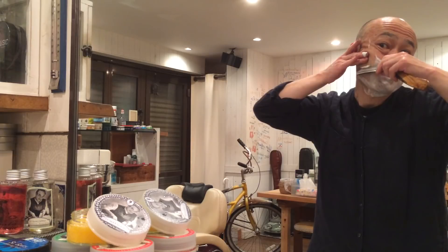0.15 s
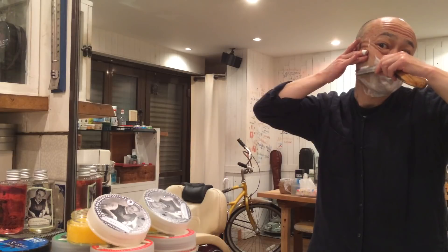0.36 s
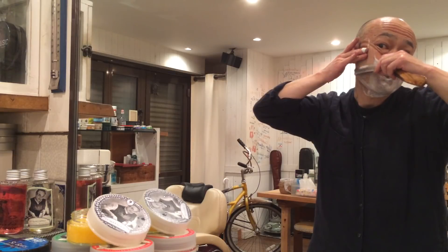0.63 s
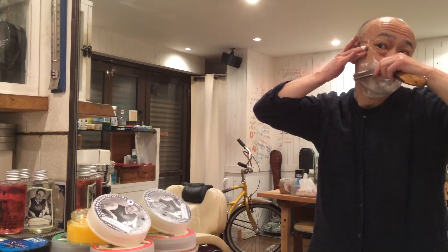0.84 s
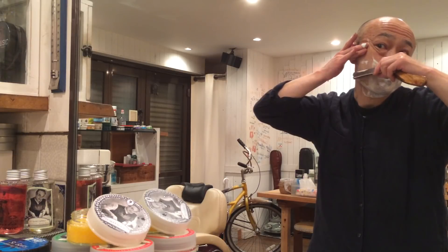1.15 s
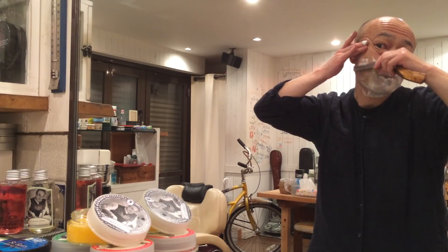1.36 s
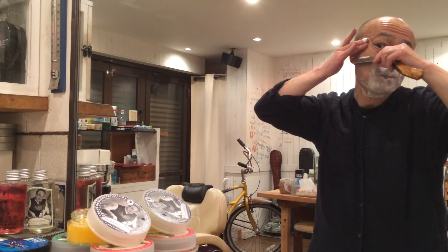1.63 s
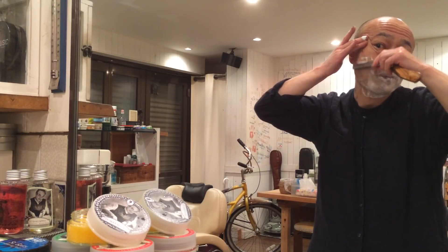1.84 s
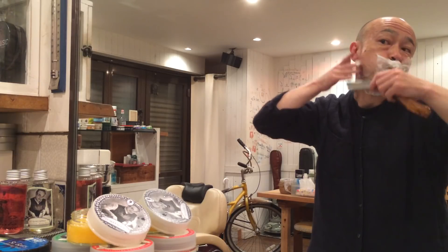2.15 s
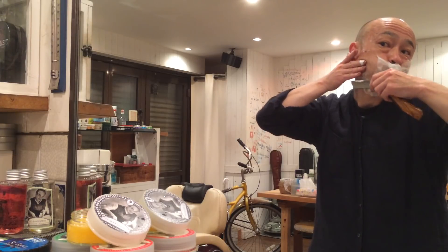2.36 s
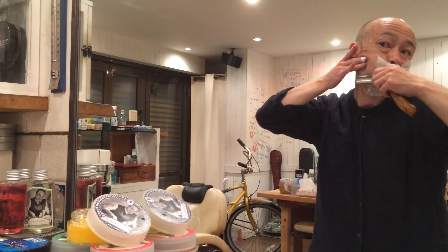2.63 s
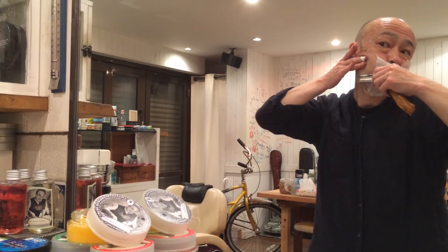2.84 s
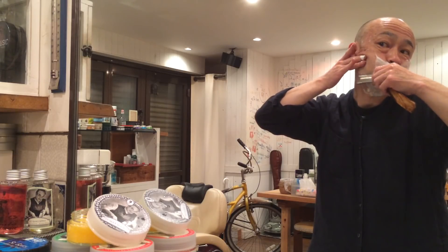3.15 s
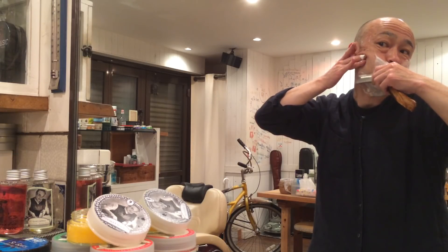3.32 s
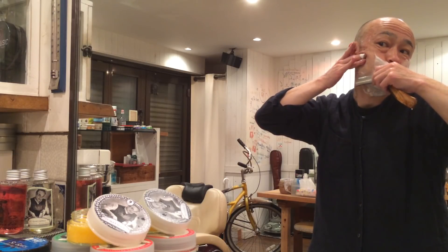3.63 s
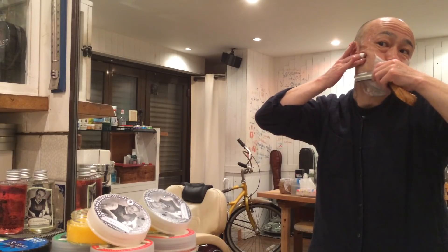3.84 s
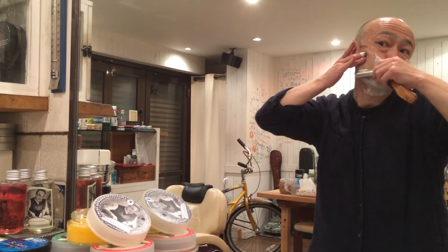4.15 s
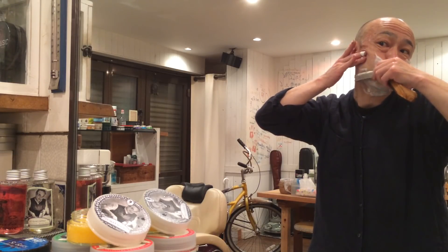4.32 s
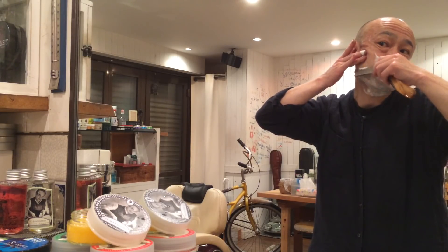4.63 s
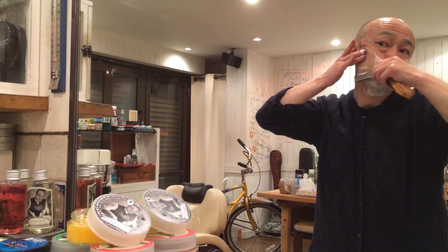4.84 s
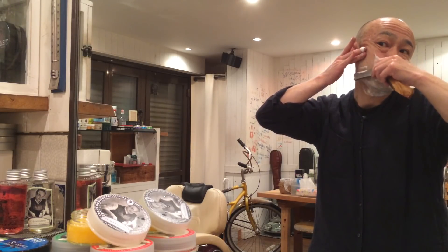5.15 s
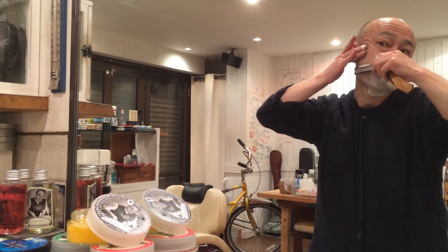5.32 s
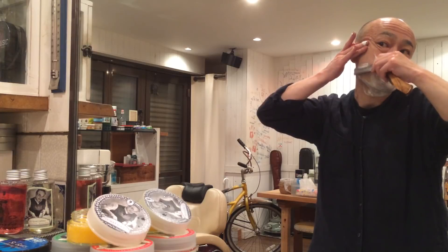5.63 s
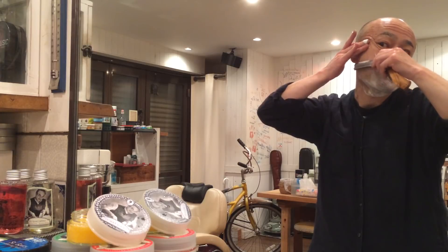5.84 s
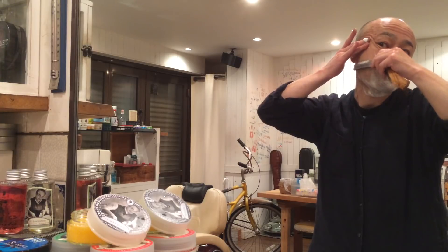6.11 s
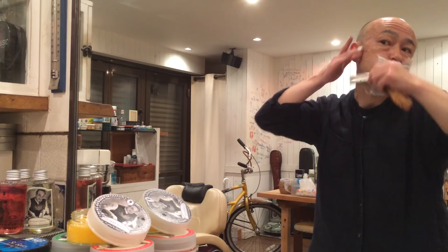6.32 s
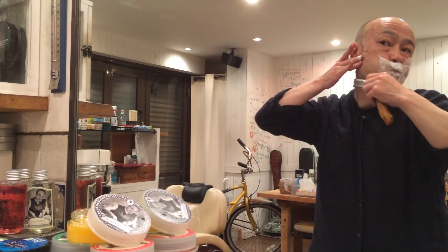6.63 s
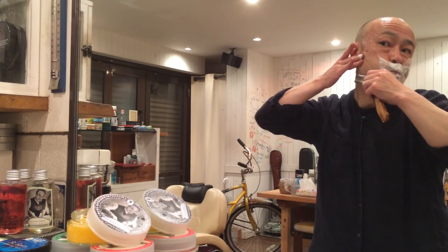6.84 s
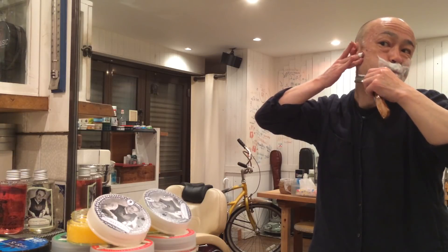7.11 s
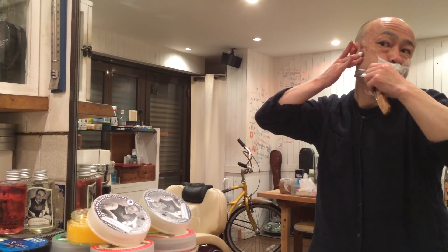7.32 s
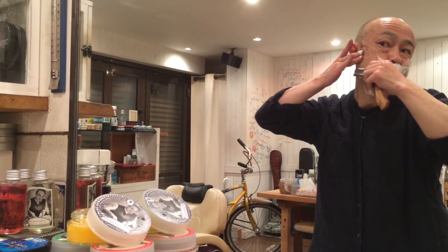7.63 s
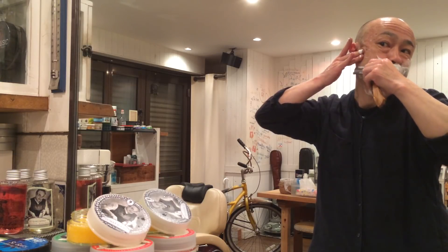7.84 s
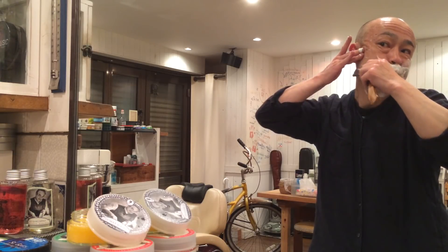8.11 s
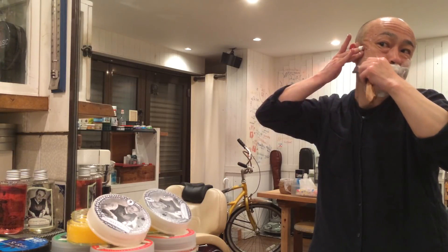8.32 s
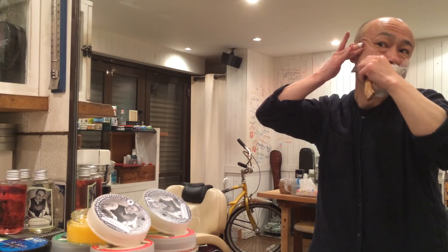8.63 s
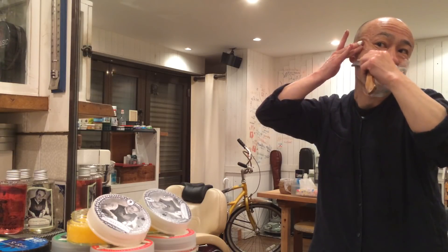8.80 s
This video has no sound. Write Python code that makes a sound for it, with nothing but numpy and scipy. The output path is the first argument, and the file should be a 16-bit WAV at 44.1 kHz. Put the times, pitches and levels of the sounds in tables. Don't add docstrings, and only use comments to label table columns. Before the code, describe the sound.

Dry, gritty shaving strokes with a faint thin metallic ring come in irregular groups, then steadily about three per second, then lightly at the end. Behind them a vehicle goes by outside, rumbling and hissing loudest around two seconds, slowing and sinking away to a faint low hum. Short room reflections, a fairly close microphone and slight steady background hiss.

```python
import sys
import numpy as np
from scipy import signal
from scipy.io import wavfile
from scipy.ndimage import uniform_filter1d

SR = 44100
rng = np.random.default_rng(int(sys.argv[2]) if len(sys.argv) > 2 else 0)


def boost_factor(decibels):
    exponent = np.asarray(decibels, float) / 20
    return 10 ** exponent


def materialize(psi):
    bounded = np.clip(np.atleast_2d(psi).T, -1, 1)
    quanta = np.round(bounded * 32767).astype(np.int16)
    wavfile.write(sys.argv[1], SR, quanta)


N = 395577
CONTROL_STEP = 100
CONTROL_T = np.arange(N // CONTROL_STEP + 2) * CONTROL_STEP / SR

# (frequency [Hz], density [dB per Hz])
HAIR_SNAP = [(2500, -10), (4700, -40), (5600, -3), (7700, -3), (8400, -6.5), (9800, -2.5), (11000, -3.5),
             (12500, -2), (14000, -2.5), (15200, -2.5), (15500, 5), (16000, -59)]
# (frequency [Hz], width [Hz], level [dB])
SPINE_MODES = [(5290, 200, 0), (5620, 220, 0), (6250, 300, -6), (4880, 250, -9)]
# (frequency [Hz], width [Hz], level [dB])
EDGE_MODES = [(6960, 170, -3), (7330, 160, 0), (9850, 180, -9), (10240, 180, -8)]
# (bite [s], length [s], pressure [dB], crest place [0-1], edge ring [dB])
CHEEK_STROKES = [
    (0.103, 0.12, -59, 0.62, -3),
    (0.286, 0.03, -83, .4, -2),
    (0.391, 0.14, -62, 0.38, -3),
]
# (bite [s], length [s], pressure [dB], crest place [0-1], edge ring [dB])
TIP_STROKES = [
    (0.68, 0.053, -65.5, .4, -4),
    (0.728, 0.082, -65.5, .25, -3),
    (0.985, 0.025, -77, .4, -5),
    (1.02, 0.082, -67, 0.33, -2),
    (1.3, 0.075, -73, .6, -1),
    (1.59, 0.067, -69, 0.77, 0),
    (1.885, 0.11, -67.5, .65, 2.5),
]
# (bite [s], length [s], pressure [dB], crest place [0-1], edge ring [dB])
JAW_STROKES = [(3.005, 0.075, -72.5, 0.56, -8), (3.255, 0.057, -68.5, 0.69, -3),
               (3.513, 0.064, -71.5, .6, 0), (3.818, 0.085, -71, 0.38, -5), (4.01, 0.025, -86, .5, 0),
               (4.09, 0.12, -66, 0.44, -6), (4.394, 0.085, -65.5, .5, -3), (4.666, 0.099, -66.5, 0.5, -3),
               (4.84, 0.025, -82, 0.33, 4), (4.964, 0.11, -67.5, 0.33, -3.5),
               (5.258, 0.115, -69.5, 0.45, -0.5), (5.566, 0.12, -64.5, .5, -1.5),
               (5.735, 0.03, -84, .3, -3), (5.833, 0.13, -65.5, 0.67, -0.5), (6.164, 0.12, -63.5, .3, -1)]
# (bite [s], length [s], pressure [dB], crest place [0-1], edge ring [dB])
FINISHING_STROKES = [
    (7.282, 0.081, -78.5, 0.47, -2),
    (7.62, 0.047, -79, 0.72, -2),
    (7.89, 0.11, -72, 0.48, -1.5),
    (8.215, 0.11, -76, 0.32, 1),
    (8.52, 0.127, -70.5, 0.56, -4),
    (8.71, 0.048, -79, .4, 0),
    (8.843, 0.095, -72, 0.3, -3),
]
# (bite under crest [dB], lift under crest [dB], squareness [exponent],
# spine ring [dB], lowest edge mode [dB], edge pitch [ratio])
HOLDS = [
    (19.5, 18, 1.65, -6.5, 2, 1.0),
    (10, 14, 1.2, -7, -2, 1.012),
    (9, 16, 3, -7.5, -0.5, 1.002),
    (10.5, 10, 1.5, -7, 0, 1.002),
]
# (frequency [Hz], t60 [s])
ROOM_T60 = [(2000, 0.15), (7000, 0.24), (15000, 0.14)]

# (time [s], cycle rate [Hz])
CYCLE_RATE = [(0, 28.2), (.5, 27.8), (2.5, 24.8), (3, 24.3), (6, 22), (7, 20.7), (8, 19.65), (8.97, 18.5)]
# (multiple of the cycle rate [1], level over the engine's [dB])
ORDERS = [(2, -11), (4, -13), (5, -13.5), (6, -14), (8, -2.5), (9, -1.5), (10.8, -13.5), (12, -18.5)]
# (row of ORDERS, centre [s], half length [s],
# level [dB])
MODE_CROSSINGS = [(0, 1.5, 0.74, -2), (0, 3.5, .6, 8.5), (1, 1.45, 0.94, 19.5), (1, 7.7, 1.6, 13.5),
                  (2, 1.53, 0.59, 18), (2, 3.13, 1.1, 12), (2, 7.4, 0.34, 16.5), (3, 2.0, .3, 21),
                  (3, 2.97, 0.29, 16.5), (3, 4.64, 0.35, 10), (4, 2.04, 0.38, 4), (4, 3.6, 0.45, 5.5),
                  (4, 6.5, 0.47, 5), (4, 7.48, .45, 8.5), (5, 0.091, 0.48, 5), (5, 1.5, 0.14, 2.5),
                  (5, 2.45, 0.21, 11.5), (5, 6.22, 0.49, 8), (6, 2.62, 0.21, 7), (6, 4.6, 1.9, 9),
                  (7, 0.27, 0.33, 10), (7, 6.2, .6, 14.5), (7, 7.7, 0.64, 13.5), (4, 0.5, 0.21, -3.5),
                  (5, 7.8, .8, -6.5), (5, 4.47, 0.27, 5), (2, 1.07, 0.23, 8)]

# (time [s], level [dB])
NEARNESS = [(0.0, -57.5), (0.3, -56), (0.7, -55), (1.1, -52.5), (1.8, -50.5), (2.2, -49.5), (2.8, -52.5),
            (3.2, -54.5), (4.0, -55.5), (4.9, -57), (6.0, -61.5), (6.5, -63), (7.0, -64.5), (8.0, -68.5),
            (8.5, -69), (8.97, -72)]
# (level at nearness -60 [dB], share of the nearness [1], extra in the gap [dB])
LAYERS = [
    (-62, 0.2, 8),
    (-55.5, 0.98, 3.5),
    (-79.5, 0.42, 4.5),
    (1, 0.05, -3),
    (-57, .8, 0.5),
]
APPROACH_DB = [
    8,
    5,
    4,
    5,
    4,
]
# (time [s], half length [s], thrum [dB], boom [dB])
RUMBLE_SWELLS = [(0.1, .1, -1, -0.5), (0.294, 0.055, 2.5, 3.5), (0.95, 0.076, 6, 2.5), (1.252, 0.077, 0, 1),
                 (1.51, 0.056, 10, 0), (1.7, 0.088, 2, 3), (1.857, 0.063, 8, -2.5), (2.03, 0.062, 5, 4),
                 (2.21, 0.056, 6, -4.5), (2.47, 0.091, -5.5, -3), (2.75, .1, 4, 2.5), (3.71, 0.071, 6, 1.5),
                 (4.797, 0.23, -2, 1), (5.603, 0.14, 1, 1), (6.07, .05, 4, 0), (6.506, 0.42, -6, 1),
                 (6.9, 0.11, -7, -7), (7.997, 0.63, 4, 0.5)]
# (frequency [Hz], density [dB per Hz])
THRUM = [(12, -48), (20, -29.5), (44, -2), (76, 7.5), (95, 4), (120, -41.5), (210, -120)]
# (frequency [Hz], density [dB per Hz])
BOOM = [(50, -23), (85, -30.5), (113, 1.5), (147, 4.5), (177, -4), (216, -2), (235, -3), (310, -14),
        (400, -41), (680, -120)]
# (frequency [Hz], density [dB per Hz])
ROAR = [(170, -34), (290, -10), (308, -7.5), (344, 2), (404, 0.5), (470, -5), (509, -6.5), (738, -11.5),
        (816, -15), (1090, -14), (2060, -24.5), (2870, -32.5), (3200, -38), (4160, -56), (7040, -120)]
# (frequency [Hz], density [dB per Hz])
HISS = [(1650, -37), (2800, -23), (2960, -2), (3540, 3.5), (4270, 1), (4820, 2.5), (6370, 1), (10500, -7.5),
        (15400, -16.5)]
# (frequency [Hz], density [dB per Hz])
ROOM_HUM = [(160, -35), (280, -16), (347, 4), (374, -14.5), (533, -17), (857, -17.5), (986, -19),
            (1040, -19.5), (1240, -22.5), (2600, -29.5), (3380, -65), (5720, -120)]
# (frequency [Hz], density [dB per Hz])
MIC_NOISE = [(1470, -13), (2500, -5.5), (4260, -8.5), (7380, -13), (8270, -12.5), (14100, -14),
             (15400, -16.5)]

TOUCH_S, LIFT_S = 0.0049, 0.012


def razor(hairs_per_s=4500, spread_db=2.5, clump_db=2.0, detune=0.0052, patch_db=1.7, catch_s=0.0045,
          drag_db=-12, echo=0.34):
    clumps = evened(uniform_filter1d(rng.standard_normal(N), size=130))
    patches = evened(uniform_filter1d(rng.standard_normal(N), size=500))
    size_db = spread_db * np.minimum(rng.exponential(1, N), 3.2) + clump_db * clumps + patch_db * patches
    is_cut = rng.random(N) < hairs_per_s / SR
    cuts = evened(boost_factor(size_db) * is_cut * rng.choice([-1., 1.], N))
    flicks = cuts * rng.choice([-1., 1.], N)

    pressed, rings = np.zeros(N), np.zeros(N + 1500)
    tables = (CHEEK_STROKES, TIP_STROKES, JAW_STROKES, FINISHING_STROKES)
    for strokes, (bite_db, lift_db, square, hold_spine_db, low_db, ratio) in zip(tables, HOLDS):
        first_hz, first_width, first_db = EDGE_MODES[0]
        edge_modes = [(first_hz, first_width, first_db + low_db)] + EDGE_MODES[1:]
        for bite_s, length, db, crest, stroke_edge_db in strokes:
            start = round((bite_s - TOUCH_S) * SR)
            u, weight = stroke(length, db, crest, bite_db, lift_db, square, catch_s)
            u, weight = u[:N - start], weight[:N - start]
            part = slice(start, start + len(u))
            pressed[part] += cuts[part] * weight
            edge_db = stroke_edge_db + 4 * (u - 0.5) - 2.0
            spine_db = hold_spine_db - 4 * (u - 0.5) - 1.5
            edge_shift, spine_shift = 1 + detune * rng.standard_normal((2, len(EDGE_MODES)))
            for modes, ring_db, shift in ((edge_modes, edge_db, ratio * edge_shift),
                                          (SPINE_MODES, spine_db, spine_shift)):
                sound = signal.oaconvolve(flicks[part] * weight * boost_factor(ring_db), ringing(modes, shift))
                rings[start:start + len(sound)] += sound

    skin = signal.butter(2, [1800, 5000], "band", fs=SR, output="sos")
    ticks = colour(pressed, HAIR_SNAP) / np.std(colour(cuts[:SR], HAIR_SNAP))
    drag = signal.sosfilt(skin, pressed) / np.std(signal.sosfilt(skin, cuts))
    direct = boost_factor(-0.5) * ticks + boost_factor(drag_db) * drag
    direct -= echo * np.roll(direct, shift=105)
    direct += rings[:N]
    return direct + boost_factor(-9) * room(direct)


def stroke(length, db, crest, bite_db, lift_db, square, catch_s):
    t = np.arange(-TOUCH_S, length + LIFT_S, 1 / SR)
    u, crest = t / length, np.clip(crest, 0.1, 0.9)
    rise_db = bite_db * abs(1 - u / crest) ** square
    fall_db = lift_db * abs((u - crest) / (1 - crest)) ** square
    sag_db = np.where(u < crest, rise_db, fall_db)
    ends = np.clip(np.minimum(1 + t / TOUCH_S, 1 + (length - t) / LIFT_S), 0, 1)
    tufts = hump(t, catch_s, catch_s) + boost_factor(-7) * hump(t, crest * length, catch_s)
    return u, boost_factor(db - sag_db) * ends ** 2 * (1 + tufts)


def ringing(modes, shift):
    t = np.arange(1500) / SR
    ring = np.zeros(len(t))
    for n, ((hz, width, db), k) in enumerate(zip(modes, shift)):
        decay = np.sqrt(width) * np.exp(-np.pi * width * t)
        ring += (-1) ** n * boost_factor(db) * decay * np.sin(2 * np.pi * hz * k * t)
    return ring / np.linalg.norm(ring)


def room(x):
    taps = np.zeros(SR // 2)
    at = np.arange(150, len(taps) - 20, 20)
    taps[at + rng.integers(0, 20, len(at))] = rng.choice([-1., 1.], len(at))
    hz, t, z = signal.stft(taps, SR, nperseg=256)
    decay = boost_factor(-60 * t / read(ROOM_T60, hz)[:, None])
    tail = signal.istft(z * decay, SR, nperseg=256)[1]
    return signal.oaconvolve(x, tail / np.linalg.norm(tail))[:N]


def engine(waver_db=4.0, wobble=0.006):
    slow = rng.standard_normal((1 + len(ORDERS), len(CONTROL_T)))
    slow = uniform_filter1d(uniform_filter1d(slow, size=28), size=28)
    drift = [evened(d) for d in slow]
    rate = curve(CYCLE_RATE, CONTROL_T) * (1 + wobble * drift[0])
    turns = np.cumsum(full_rate(rate)) / SR
    engine_db = vehicle_levels(CONTROL_T)[-1]
    level_db = np.array([engine_db + db + waver_db * d for (_, db), d in zip(ORDERS, drift[1:])])
    for row, s, width, db in MODE_CROSSINGS:
        level_db[round(row)] += db * hump(CONTROL_T, s, width)
    return sum(full_rate(boost_factor(db)) * np.sin(2 * np.pi * k * turns) for (k, _), db in zip(ORDERS, level_db))


def road():
    thrum_db, boom_db, hiss_db, bright_db, _ = vehicle_levels(CONTROL_T)
    for s, width, low_db, mid_db in RUMBLE_SWELLS:
        patch = hump(CONTROL_T, s, width)
        thrum_db = thrum_db + low_db * patch
        boom_db = boom_db + mid_db * patch
    thrum = full_rate(boost_factor(thrum_db)) * rush(THRUM, 1.5, size=4096)
    boom = full_rate(boost_factor(boom_db)) * rush(BOOM, 3.3, size=4096)
    roar = full_rate(boost_factor(curve(NEARNESS, CONTROL_T))) * rush(ROAR, 2.08, size=4096)
    hiss = rush(HISS, 2.4, size=1024)
    top = signal.sosfiltfilt(signal.butter(2, 8000, "high", fs=SR, output="sos"), hiss)
    hiss += (full_rate(boost_factor(bright_db)) - 1) * top
    return thrum + boom + roar + full_rate(boost_factor(hiss_db)) * hiss + boost_factor(-70) * rush(ROOM_HUM, 3.9)


def vehicle_levels(t):
    seen = 1 + np.tanh((t - 0.66) / 0.43)
    not_hidden = 1 - np.tanh((t - 2.95) / 0.14)
    gap = seen * not_hidden / 4
    early = (1 - np.tanh(t - 1.34)) / 2
    near_db = curve(NEARNESS, t)
    return [db + share * (near_db + 60) + gap_db * gap + early_db * early
            for (db, share, gap_db), early_db in zip(LAYERS, APPROACH_DB)]


def microphone_noise():
    return boost_factor(-79.5) * rush(MIC_NOISE, 0.45, size=1024)


def rush(points, patchy_db, size=2048):
    hz = np.fft.rfftfreq(size, 1 / SR)
    a, b, patches = rng.standard_normal((4 * N // size + 5, len(hz), 3)).T
    patches = uniform_filter1d(patches, size=3, axis=0)
    patches = evened(uniform_filter1d(patches, size=24, axis=1))
    z = (a + 1j * b) * boost_factor(read(points, hz)[:, None] + patchy_db * patches)
    return evened(signal.istft(z, nperseg=size, noverlap=3 * size // 4)[1][:N])


def colour(x, points):
    gain_db = read(points, abs(np.fft.fftfreq(4096, 1 / SR)))
    log_gain = np.log(boost_factor(np.maximum(gain_db, -100)))
    taps = np.fft.ifft(np.exp(np.conj(signal.hilbert(log_gain)))).real[:2048]
    return signal.oaconvolve(x, taps)[:N]


def read(points, hz):
    f, value = np.transpose(points)
    return np.interp(np.log(hz + 1), np.log(f + 1), value)


def curve(rows, t):
    s, value = np.transpose(rows)
    return np.interp(t, s, value)


def full_rate(control):
    return np.interp(np.arange(N) / CONTROL_STEP, np.arange(len(control)), control)


def hump(t, s, width):
    return np.exp(-((t - s) / width) ** 2)


def evened(x):
    return x / np.sqrt(np.mean(x ** 2) + 1e-20)


def scene():
    return (razor() + engine() + road())[None]


def top_cut(x):
    return signal.sosfilt(signal.butter(12, 15330, fs=SR, output="sos"), x)


def record(dry):
    heard = dry + microphone_noise()
    low_pass = signal.firwin(1201, 15400, window=("kaiser", 8), fs=SR)
    heard = signal.oaconvolve(heard, low_pass[None], "same")
    return top_cut(heard)


dry = scene()
out = record(dry)
materialize(out)
```